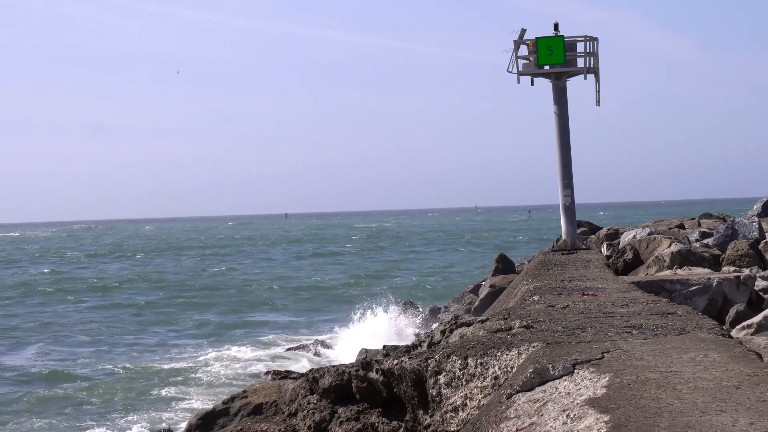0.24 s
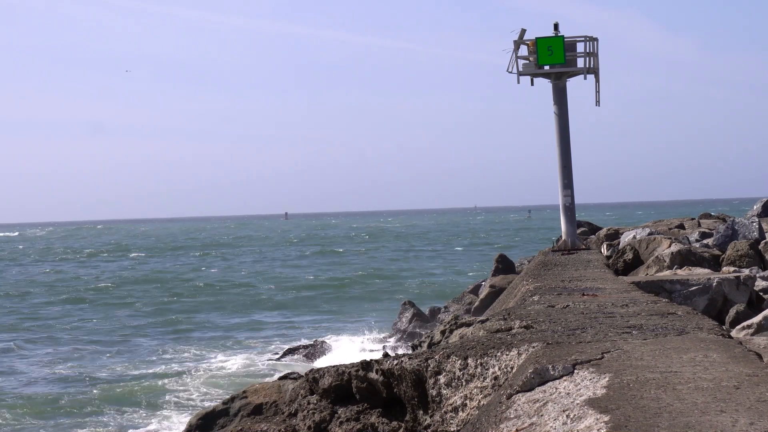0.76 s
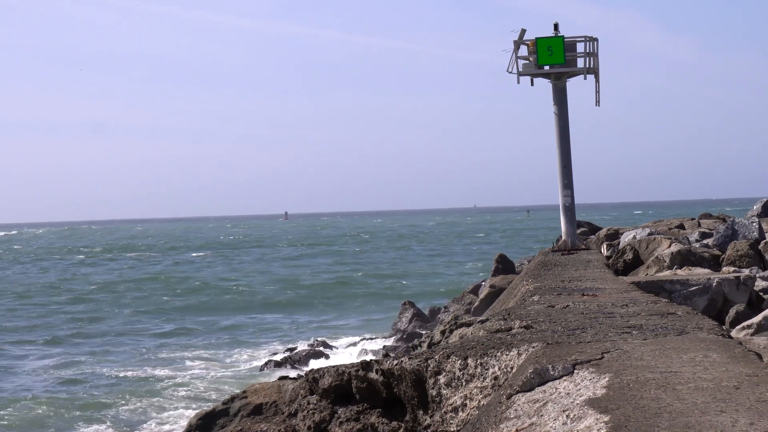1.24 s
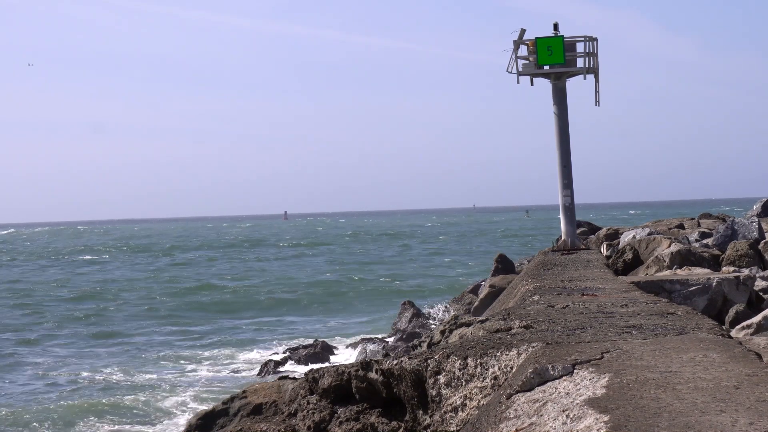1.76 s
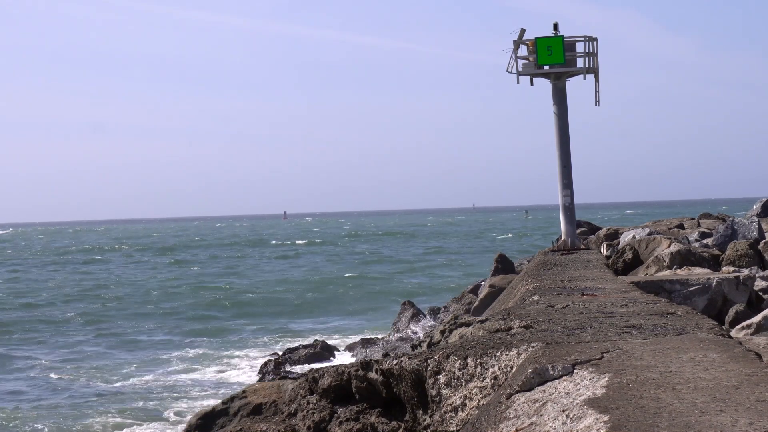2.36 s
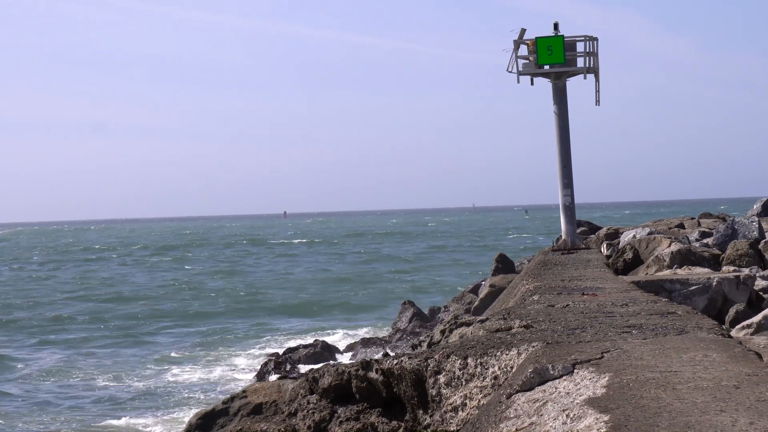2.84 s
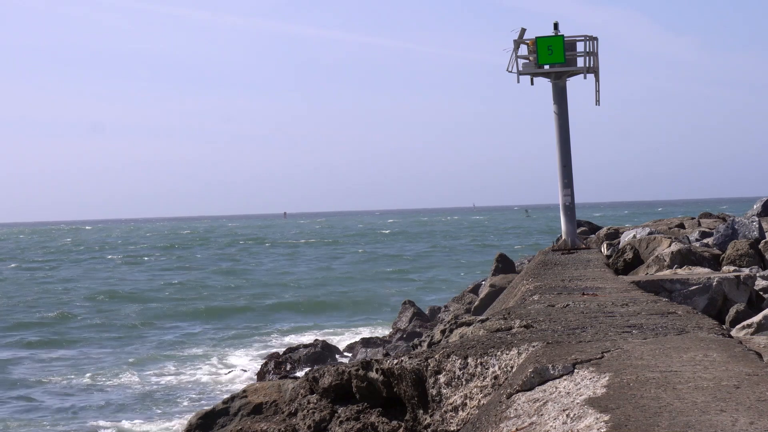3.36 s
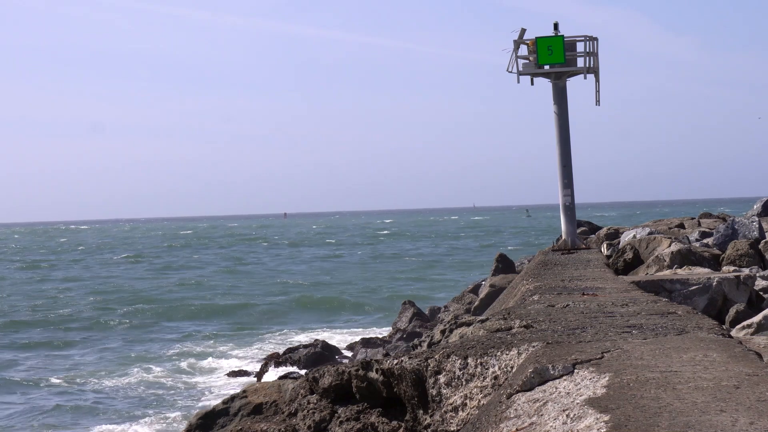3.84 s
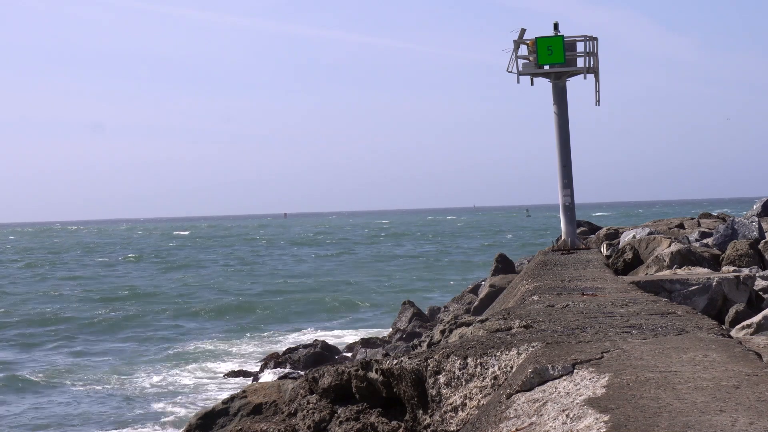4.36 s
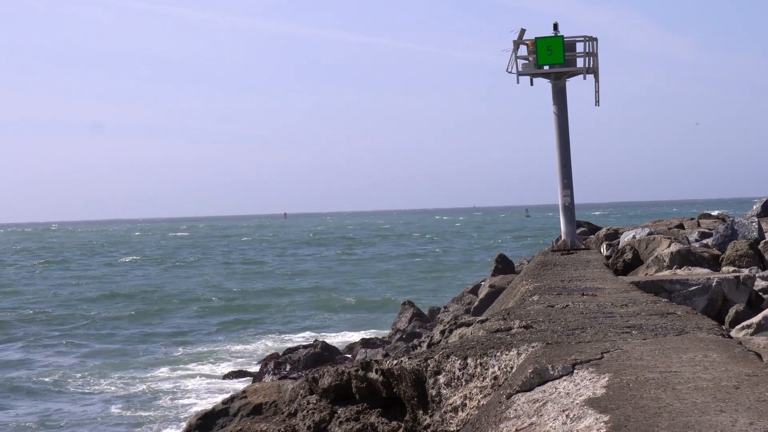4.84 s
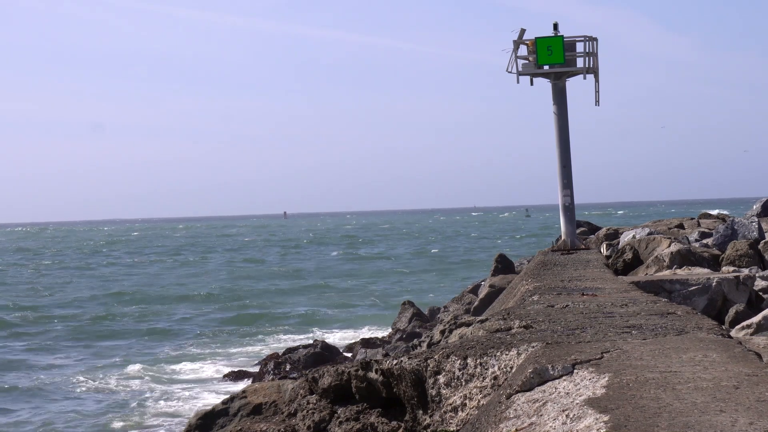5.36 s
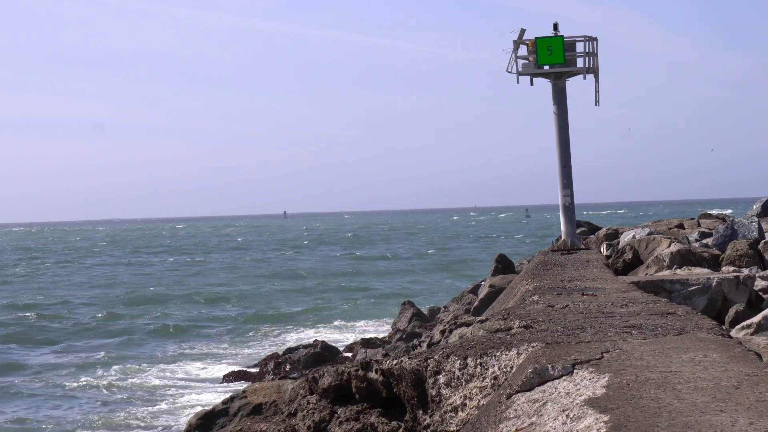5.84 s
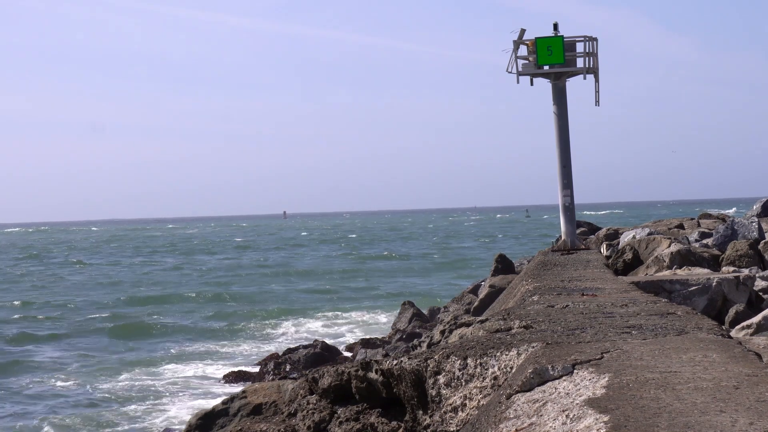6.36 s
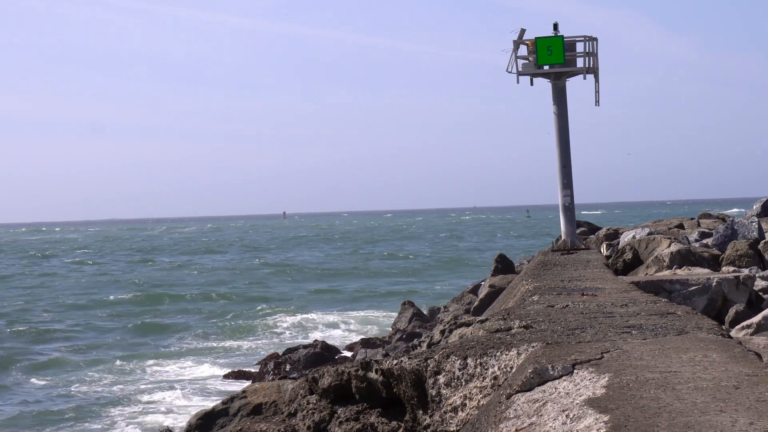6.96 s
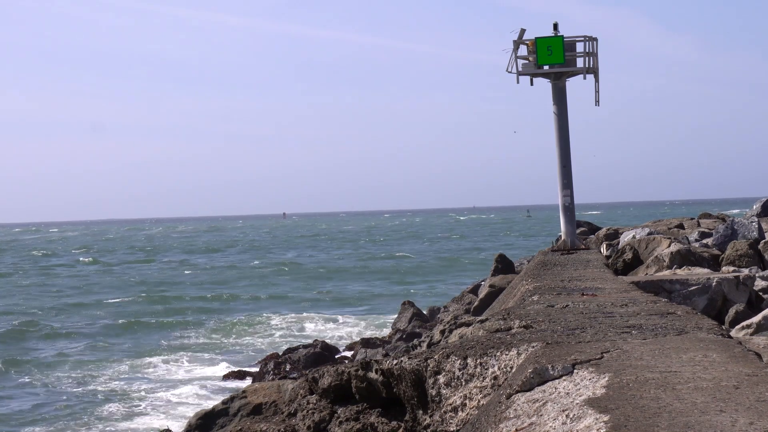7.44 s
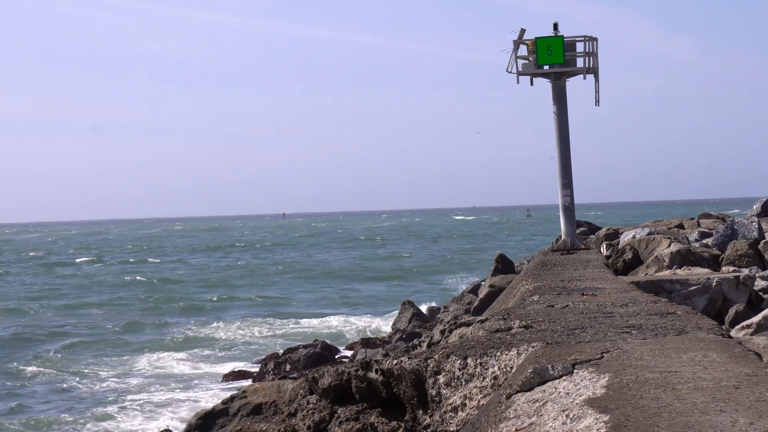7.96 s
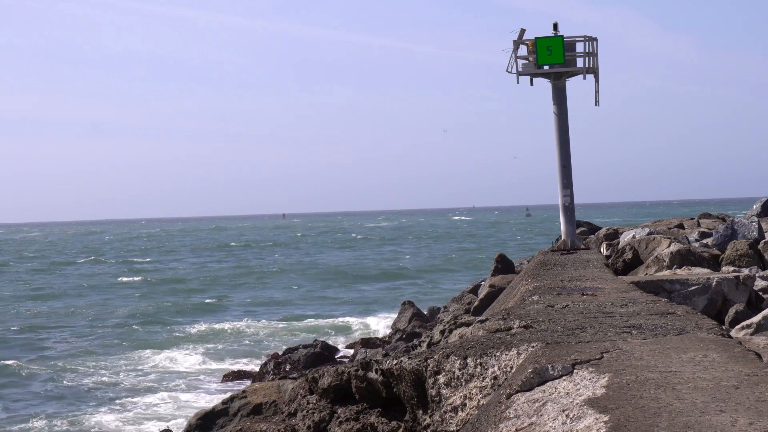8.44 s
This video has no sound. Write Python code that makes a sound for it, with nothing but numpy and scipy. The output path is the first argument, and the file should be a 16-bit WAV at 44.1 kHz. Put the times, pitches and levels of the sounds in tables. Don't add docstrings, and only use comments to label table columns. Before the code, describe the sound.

Outdoors on a rocky jetty, low wind buffets a nearby microphone while sea roars and washes over rocks. After about two and a half seconds an electric foghorn sounds one steady, fairly pure mid-pitched note for three seconds, the sea and wind dipping under it. It stops cleanly, faint wavering echoes return, and surf and wind come back.

```python
import sys
import numpy as np
from scipy import signal
from scipy.fft import rfft, irfft, next_fast_len
from scipy.io import wavfile
from scipy.ndimage import uniform_filter1d, map_coordinates

SR = 44100
rng = np.random.default_rng(int(sys.argv[2]) if len(sys.argv) > 2 else 0)


def to_wav(sig):
    pcm = np.clip(np.atleast_2d(sig), -1, 1) * 32767
    pcm = np.round(pcm).astype(np.int16)
    wavfile.write(sys.argv[1], SR, pcm.T)


def voltage_ratio(level):
    return 10 ** (np.asarray(level, float) / 20)


N = 383669

# [start t/s, stop t/s]
BLAST = (2.479, 5.474)
PITCH_HZ = 411.65
PARTIALS_DB = [-20, -33, -42, -53.5, -63]
GROWTH_DB_PER_S = [0.52, 1, 1.1, 0.097, -.5]
# [t/s, length/s, depth of the 1st partial/dB]
SAGS = [
    (2.57, .06, 0.5),
    (2.68, 0.02, 3.5),
    (2.86, 0.091, 2),
    (3.103, .25, 1.7),
    (3.85, 0.11, 1),
]
SAG_DEEPENS = 0.25
# [t/s, length/s, depth/dB]
FADES = [
    [(2.6, 0.27, 6.5), (3.44, 0.27, 10.5), (3.1, .5, 0), (3.75, 0.27, 2.5), (4.57, .15, 3.5),
     (5.17, 0.42, 13), (5.46, 0.12, 2)],
    [(2.6, .25, 2.5), (3.4, 0.54, 0.5), (3.98, 0.27, -3.5), (3.8, .3, 1), (5.45, 0.36, 5.5)],
    [(2.55, .25, 6), (2.92, .2, -4.5), (4.2, 1.2, 14), (5.07, 0.17, 12)],
    [(2.78, .15, -5.5), (4.6, 1.1, 8.5)],
]
EARLY_FLUTTER, FLUTTER_CALMS_S = 2.7, 0.21

# [t/s, length/s, level/dB]
ECHOES = [
    (5.706, 0.11, -39.5),
    (6.05, 0.3, -47),
    (6.617, 0.1, -39.5),
]
ECHO_TAIL_DB = [-44.5, -43.5]
ECHO_T60_S = [6, 2.2]

DUCK_DB, DUCK_S, RECOVER_FROM_S, RECOVER_S = 7.5, 0.1, 4.3, 1.5

# [t/s, level/dB]
BREEZE = [(0, -35.5), (.55, -32), (.8, -33.5), (1.2, -29), (1.7, -32.5), (2.2, -28), (3.15, -24.5),
          (3.4, -27), (3.8, -29), (4.3, -28), (4.9, -40.5), (5.45, -42), (5.9, -36), (6.05, -34.5),
          (7.3, -32.5), (7.85, -38.5), (8.3, -38.5), (8.7, -33.5)]
# [t/s, length/s, level/dB, flapping over thumping/dB]
GUSTS = [(.12, .17, -23, -8), (0.387, .1, -28, -1), (0.548, 0.12, -28.5, -5), (0.983, .14, -27.5, -3),
         (1.138, 0.072, -29, -2), (1.252, 0.15, -24, -2.5), (1.452, 0.088, -23, -21),
         (2.033, .08, -30.5, -1.5), (2.13, .12, -25.5, -7), (2.355, 0.098, -26, 0.5),
         (2.432, .13, -21.5, -10), (2.69, .09, -27.5, -11), (2.85, 0.097, -29.5, -2.5),
         (3.03, 0.16, -28, 1), (3.14, .1, -28.5, -1), (3.417, 0.063, -31.5, -10), (3.845, .15, -32, -6.5),
         (4.15, .09, -32, -9), (4.29, .08, -33, -12), (4.62, .1, -39, -6.5), (5.15, .2, -37, -6),
         (5.565, 0.11, -38, -12), (6.07, 0.097, -30, -5), (6.273, 0.18, -31, -5), (6.531, 0.088, -32, -7),
         (6.954, .14, -30, -11), (7.41, 0.18, -32, -1), (7.657, .15, -28.5, -9), (7.99, 0.2, -33, -9.5),
         (8.59, .14, -31, -5)]
FLAP_DB, FLAP_FOLLOWS = -4, 0.77
# [f/Hz, level per Hz/dB]
THUMP = [(5.9, -32.5), (10, -0.5), (28, 0.5), (45, 0.5), (85, -4.5), (110, -28.5), (160, -120)]
# [f/Hz, level per Hz/dB]
FLAP = [(38, -31.5), (65, -2), (135, -3), (189, -9.5), (226, -10.5), (330, -14), (430, -38.5), (730, -120)]

# [t/s, surge/dB, nearness of the wash/dB]
SEA = [(0, 1, -1.5), (.2, -1, 1), (.47, 2, -0.5), (.9, -.5, 1), (1.7, .5, 0), (1.95, -0.5, 0.5),
       (2.3, 0.5, 0), (2.9, 0.5, -1.5), (3.07, -2.5, -1), (3.35, 1.5, -0.5), (4.4, -.5, -.3), (5.15, 1, 3),
       (5.5, -0.5, 2), (6.75, 1.5, 2), (7.55, 0.5, .5), (7.8, 2.5, 2.5), (8.35, .5, 0.5), (8.7, 0.5, 2)]
LAYERS = {"roar": (-34, 0.9, -0.25), "wash": (-43, 0.99, 0.53), "foam": (-57.5, .85, -.6),
          "spray": (-63.5, 1.01, 1.1)}
# [f/Hz, level per Hz/dB]
ROAR = [(88, -25.5), (150, -3), (295, -3), (433, -3), (533, -5), (817, -5.5), (1010, -6), (1240, -13.5),
        (1800, -30.5), (2340, -52.5), (3960, -120)]
# [f/Hz, level per Hz/dB]
WASH = [(710, -27), (1200, 0), (1250, -3.5), (1620, -3.5), (1760, -2.5), (2530, -6), (3260, -6),
        (3950, -9.5), (4720, -29), (5500, -26.5), (7150, -57), (12100, -120)]
# [f/Hz, level per Hz/dB]
FOAM = [(2530, -29.5), (4300, -1.5), (4730, -5), (6600, -8.5), (8580, -37.5), (14500, -120)]
# [f/Hz, level per Hz/dB]
SPRAY = [(3760, -31.5), (6400, -4), (7830, -0.5), (8690, -5.5), (11500, -11.5), (15600, -22)]
# [t/s, length/s, level/dB]
SPLASHES = [
    (.55, .25, 0.5),
    (1.75, 0.18, -0.5),
    (2.25, 0.27, 2),
    (3.379, .2, 1),
    (3.95, .15, 2),
    (5.15, 0.22, 1.5),
    (6.9, .2, 1),
    (7.834, 0.22, 2.5),
]
SPLASH_IN_FOAM = 0.77
# [t/s, peak level/dB, f/Hz, life/cycles]
PLOPS = [
    (2.438, -23, 830, 5),
    (6.745, -30, 750, 16),
]


def horn():
    t = np.arange(N) / SR
    since = np.clip(t - BLAST[0], 0, None)
    after = np.clip(t - BLAST[1], 0, None)
    swell = 1 - np.exp(-since / 0.005)
    ring = voltage_ratio(-60 * after / 0.3) * (1 - 0.4 * (1 - np.exp(-after / 0.004)))
    buzz = np.clip((since - 0.009) / 0.003, 0, 1) * (1 + 1.1 * np.exp(-since / 0.03))
    phase = 2 * np.pi * PITCH_HZ * (t + 0.11 * 0.011 * np.exp(-since / 0.011))
    tone = np.zeros(N)
    for k in range(1, len(PARTIALS_DB) + 1):
        drift = 0.055 * k * wobble(1.2)
        flutter_db = 0.45 * np.sqrt(k) * wobble(28)
        if k == 1:
            shape = swell * ring
        else:
            flutter_db = flutter_db * (1 + EARLY_FLUTTER * np.exp(-since / FLUTTER_CALMS_S))
            shape = buzz * ring ** (2.1 * (k - 1))
        level = np.sqrt(2) * voltage_ratio(partial_db(k) + flutter_db)
        tone += level * shape * np.sin(k * phase + drift)
    return tone


def partial_db(k):
    since = np.clip(np.arange(N) / SR - BLAST[0], 0, BLAST[1] - BLAST[0])
    sags = sum(db * bump(s, length) for s, length, db in SAGS)
    sags = sags * (1 + SAG_DEEPENS * (k - 1))
    own_fades = FADES[k - 2] if k > 1 else []
    fades = sum(db * bump(s, length) for s, length, db in own_fades)
    return PARTIALS_DB[k - 1] + GROWTH_DB_PER_S[k - 1] * since - sags - fades


def echoes():
    t = np.arange(N) / SR
    after = np.clip(t - BLAST[1], 0, None)
    rock_returns = sum(voltage_ratio(db) * bump(s, length) for s, length, db in ECHOES)
    out = np.zeros(N)
    for k in (1, 2):
        tail = voltage_ratio(ECHO_TAIL_DB[k - 1] - 60 * after / ECHO_T60_S[k - 1])
        level = tail * np.clip(after / 0.03, 0, 1)
        if k == 1:
            level = level + rock_returns
        waver = voltage_ratio(1.6 * wobble(30))
        phase = 2 * np.pi * k * PITCH_HZ * t + 1.6 + 0.35 * wobble(12)
        out += np.sqrt(2) * level * waver * np.sin(phase)
    return out


def wind():
    breeze_db = curves(BREEZE)[0] + duck_db()
    mean_db = breeze_db.mean()
    lull_db = mean_db + FLAP_FOLLOWS * (breeze_db - mean_db) + FLAP_DB
    thump_power = voltage_ratio(breeze_db) ** 2
    flap_power = voltage_ratio(lull_db) ** 2
    for s, length, db, flap_over_db in GUSTS:
        gust = bump(s, length)
        thump_power = thump_power + (voltage_ratio(db) * gust) ** 2
        flap_power = flap_power + (voltage_ratio(db + flap_over_db) * gust) ** 2
    thump = unit(voltage_ratio(0.36 * wobble(27)) * coloured(rng.standard_normal(N), THUMP))
    thump = unit(np.tanh(0.31 * thump))
    lumps = voltage_ratio(1.1 * wobble(12) + 2.3 * wobble(30))
    flap = unit(lumps * coloured(rng.standard_normal(N), FLAP))
    return np.sqrt(thump_power) * thump + voltage_ratio(-0.46) * np.sqrt(flap_power) * flap


def surf():
    swell_db, near_db = curves(SEA)
    ducked_swell_db = swell_db + duck_db()
    db = {}
    for name, (base_db, follows, close) in LAYERS.items():
        db[name] = base_db + follows * ducked_swell_db + close * near_db
    splash_db = sum(up_db * bump(s, length) for s, length, up_db in SPLASHES)
    surge = 0.23 * wobble(3.4) + 0.3 * wobble(11) + 0.59 * wobble(24)
    drops = rng.standard_normal(N) * (rng.random(N) < 0.03)
    roar = voltage_ratio(db["roar"] + 0.85 * surge) * coloured(patchy(depth_db=0.5), ROAR)
    wash = voltage_ratio(db["wash"] + 0.87 * surge) * coloured(patchy(depth_db=0.43), WASH)
    foam_db = db["foam"] + SPLASH_IN_FOAM * splash_db + 0.86 * surge
    foam = voltage_ratio(foam_db) * coloured(patchy(depth_db=0.4), FOAM)
    spray_db = db["spray"] + splash_db + 0.57 * surge + 0.81 * wobble(10)
    spray = voltage_ratio(spray_db) * coloured(patchy(depth_db=1.4) + 0.29 * unit(drops), SPRAY)
    sea = roar + wash + foam + spray
    for s, peak_db, hz, cycles in PLOPS:
        pop = bubble(hz, cycles)
        sea[round(s * SR):][:len(pop)] += voltage_ratio(peak_db) * pop
    return sea


def bubble(hz, cycles):
    t = np.arange(SR // 10) / SR
    life = cycles / hz
    ringing = np.sin(2 * np.pi * hz * t * (1 + 0.02 * t / life))
    return ringing * np.exp(-t / life) * (1 - np.exp(-t / 0.001))


def duck_db():
    t = np.arange(N) / SR
    drop = 1 - np.exp(-np.clip(t - BLAST[0], 0, None) / DUCK_S)
    back = np.clip((t - RECOVER_FROM_S) / RECOVER_S, 0, 1)
    return -DUCK_DB * drop * (1 - back)


def patchy(depth_db):
    z = signal.stft(rng.standard_normal(N), nperseg=512)[2]
    field = uniform_filter1d(rng.standard_normal(z.shape), size=8, axis=0)
    field = uniform_filter1d(field, size=12, axis=1)
    return signal.istft(z * voltage_ratio(depth_db * unit(field)), nperseg=512)[1][:N]


def coloured(x, spectrum):
    m = next_fast_len(N + 8192)
    hz, db = np.transpose(spectrum)
    log_f = np.log(np.fft.rfftfreq(m, 1 / SR) + 1)
    gain = voltage_ratio(np.interp(log_f, np.log(hz + 1), db))
    return unit(irfft(rfft(x, m) * gain, m)[:N])


def wobble(rate):
    steps = np.arange(0, N + 64, 64)
    knots = rng.standard_normal(int(N * 40 / SR) + 4)
    smooth = map_coordinates(knots, [steps * min(rate, 39) / SR])
    return np.interp(np.arange(N), steps, smooth)


def bump(s, length):
    return np.exp(-np.log(16) * ((np.arange(N) / SR - s) / length) ** 2)


def curves(rows):
    s, *cols = np.transpose(rows)
    return [np.interp(np.arange(N) / SR, s, c) for c in cols]


def unit(x):
    return x / np.sqrt(np.mean(x ** 2) + 1e-20)


def scene():
    return (horn() + echoes() + wind() + surf())[None]


def low_pass(x):
    return signal.sosfilt(signal.butter(12, 15770, fs=SR, output="sos"), x)


def record(dry):
    hiss_colour = [(5000, -29.0), (9000, -3.5), (16000, 0)]  # f/Hz, level per Hz/dB
    hiss = voltage_ratio(-80.5) * coloured(rng.standard_normal(N), hiss_colour)
    soft = dry / (1 + np.abs(dry / 0.27) ** 5) ** (1 / 5)
    return low_pass(soft + hiss)


dry = scene()
out = record(dry)
to_wav(out)
```